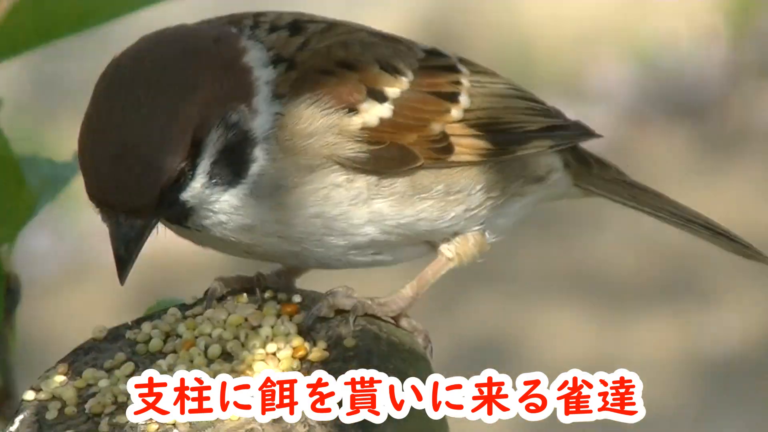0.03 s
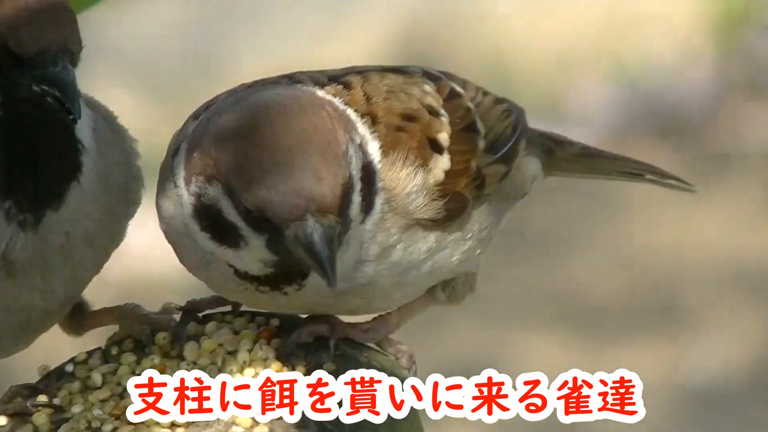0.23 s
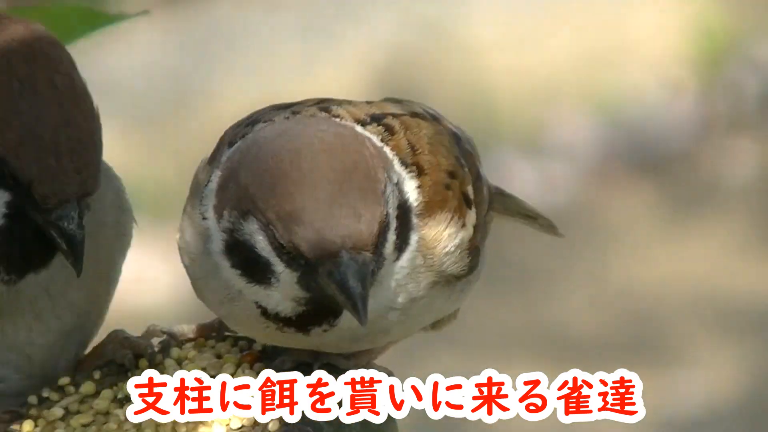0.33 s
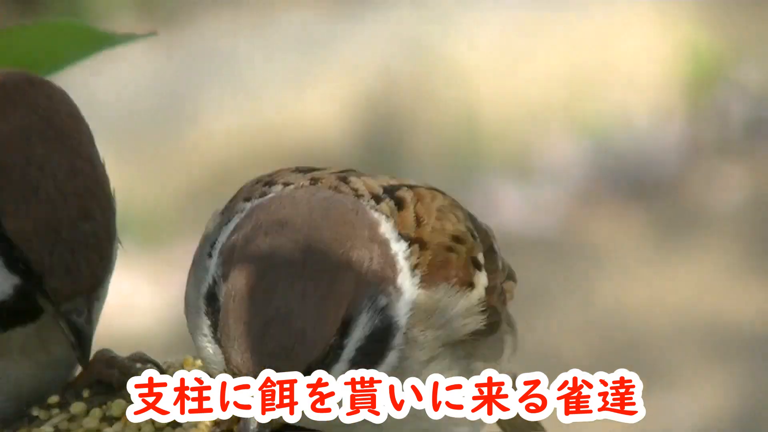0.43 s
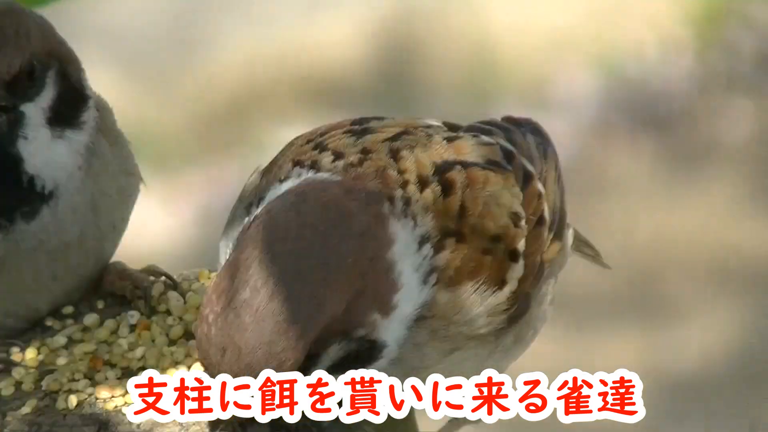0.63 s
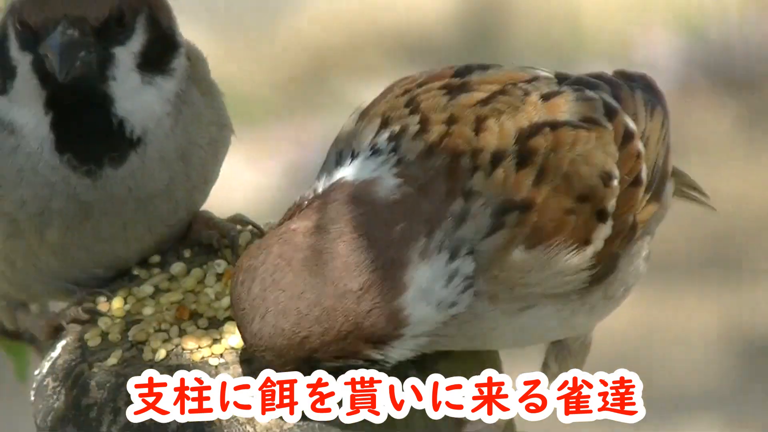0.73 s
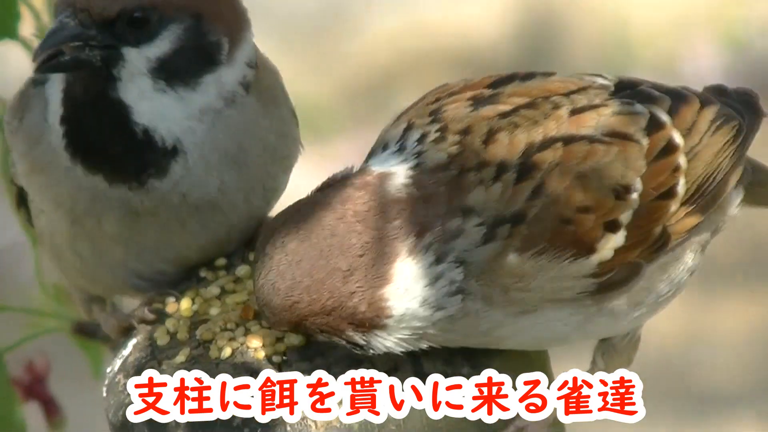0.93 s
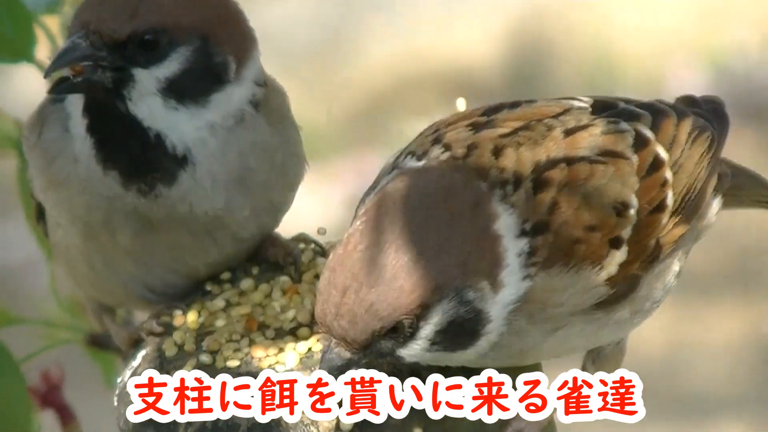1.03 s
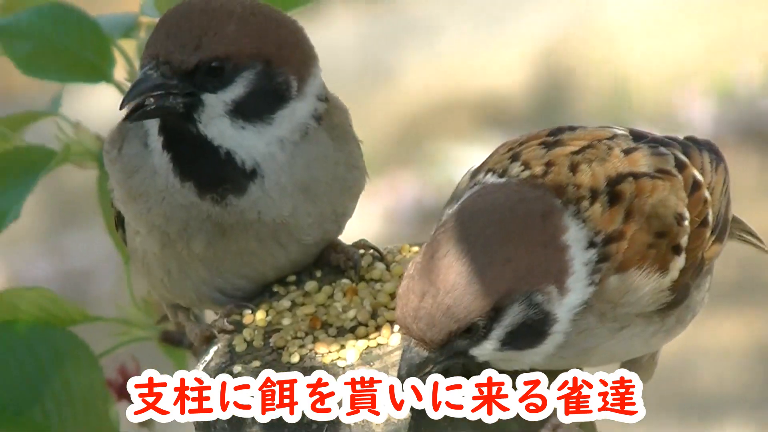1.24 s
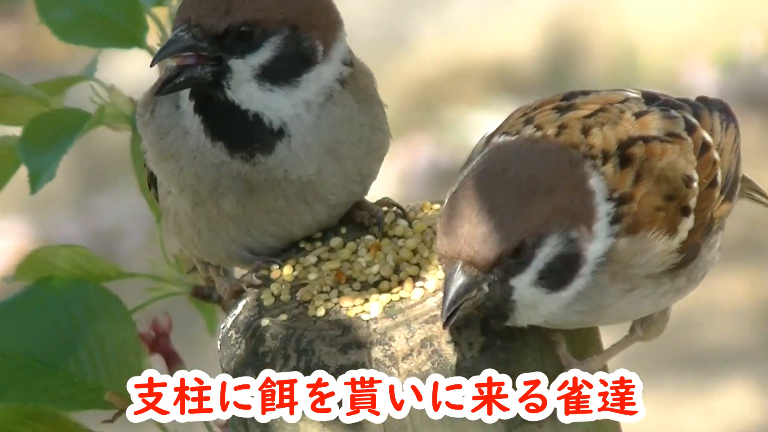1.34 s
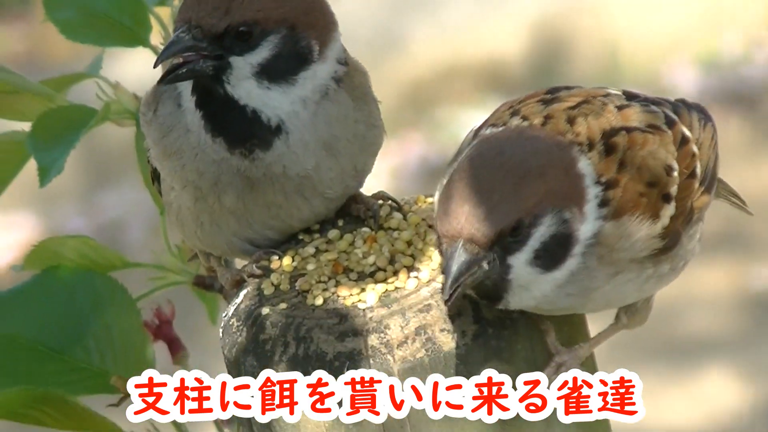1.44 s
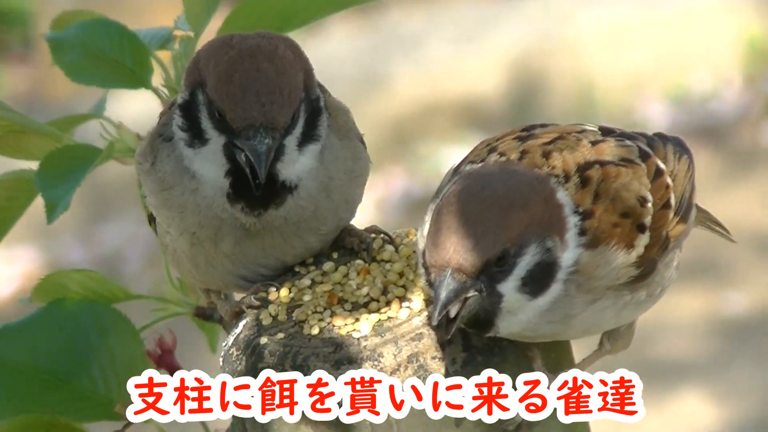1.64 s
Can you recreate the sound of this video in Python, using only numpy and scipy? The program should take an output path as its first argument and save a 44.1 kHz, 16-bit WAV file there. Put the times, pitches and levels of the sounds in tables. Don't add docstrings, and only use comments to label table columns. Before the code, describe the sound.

Sparrows chirp at close range outdoors. Small scrapes and ticks open, then a sharp chirp slides up and down at 0.2-0.34 seconds. Soft wing thumps and feather hiss flutter until about 0.65, with pecking clicks. At 0.92 a hoarse breath leads into a rapid falling trill, ending near 1.03. Faint distant whistles follow until 1.17, then scuffs and seed clicks over a low, gently fading hum.

```python
import sys
import numpy as np
from scipy import signal
from scipy.io import wavfile
from scipy.ndimage import uniform_filter1d

SR = 44100
rng = np.random.default_rng(int(sys.argv[2]) if len(sys.argv) > 2 else 0)


def wav_record(signal):
    frames = np.transpose(np.atleast_2d(signal))
    bounded = np.clip(frames, -1, 1)
    quanta = np.round(bounded * 32767).astype(np.int16)
    wavfile.write(sys.argv[1], SR, quanta)


def elevation(decibels):
    levels = np.asarray(decibels, float)
    return 10 ** (levels / 20)


N = 74970

# t/s, level/dB
HUM_SWELL = [
    (0, 3),
    (.5, 2),
    (1.1, 0.5),
    (1.7, 0),
]
# f/Hz, level per Hz/dB
HUM_COLOR = [(40, -46), (100, -5), (250, 0.5), (600, -4.5), (1500, -8.5), (4000, -19), (8500, -27),
             (15800, -38)]
# f/Hz, likeness (0 to 1)
EAR_LIKENESS = [(60, 0.97), (180, 0.99), (550, 0.97), (1650, 0.91), (4970, 0.86), (15000, 0.96)]
# start t/s, length/s, level/dB, f/Hz
SCUFFS = [
    (0, 0.031, -47.5, 4300),
    (0.122, 0.025, -56.5, 7450),
    (0.197, 0.031, -40, 7260),
    (0.343, 0.12, -53.5, 2800),
    (0.451, 0.074, -51, 4890),
    (0.657, 0.11, -58.5, 7100),
    (0.755, 0.11, -56.5, 2560),
    (1.269, 0.053, -51.5, 4640),
    (1.396, 0.11, -58, 5400),
    (1.446, 0.042, -48.5, 3280),
]
# t/s, peak level/dB, ring f/Hz, top f/Hz
TICKS = [(0.0351, -35, 4330, 10600), (0.0695, -32.5, 2980, 10500), (0.217, -22.5, 8950, 12300),
         (.4325, -36, 2100, 4000), (.434, -49, 6000, 12940), (.4615, -41, 4070, 9000),
         (0.4868, -25.5, 3500, 12100), (0.554, -41, 7000, 14000), (0.5945, -39, 6000, 13000),
         (0.817, -38.5, 3480, 14000), (0.865, -35, 4360, 7600), (.9145, -39, 1800, 5000),
         (1.042, -46, 10000, 12000), (1.123, -38.5, 4500, 8300), (1.179, -52, 10500, 12500),
         (1.213, -46, 5500, 9000), (1.222, -53, 9000, 13000), (1.2335, -35.5, 2980, 8450),
         (1.257, -52, 8000, 12000), (1.278, -41, 3500, 9000), (1.3299, -34, 10500, 17600),
         (1.379, -46, 4000, 8500), (1.418, -37, 4500, 8000), (1.4492, -29, 3270, 8950),
         (1.4528, -45, 3950, 5960), (1.4548, -33, 2980, 9500), (1.4652, -37, 2300, 5000),
         (1.468, -46, 3200, 6500), (1.58, -50, 7000, 10000), (1.616, -61, 5000, 9000)]
# t/s, thud level/dB, thud f/Hz, feather hiss level/dB
WING_BEATS = [(.068, -44.5, 1310, -68), (.108, -49.5, 446, -72), (.33, -43, 920, -46.5),
              (.397, -48, 700, -53.5), (.432, -38, 790, -54.5), (0.47, -43, 495, -49),
              (0.513, -43.5, 770, -50), (.553, -36.5, 746, -61), (0.593, -49, 700, -55.5),
              (.631, -43.5, 860, -53.5), (.669, -67, 590, -57.5), (0.759, -73, 600, -55.5),
              (1.238, -55, 1390, -78), (1.382, -49, 1460, -76), (1.086, -46.5, 1190, -77)]
# t/s, f/Hz, level/dB, step from one overtone to the next/dB
SLIDE_LOW = [(.203, 2080, -71, 6), (.213, 2066, -40.5, 7), (.233, 2031, -36, -5.5), (.246, 2690, -33, -8.5),
             (.256, 3482, -31.5, -13), (.267, 3770, -28.5, -16), (.283, 3370, -27.5, -10.5),
             (.3, 3184, -23.5, -15.5), (.31, 2968, -22, -11.5), (.325, 2270, -21.5, -12.5),
             (.331, 1886, -34.5, -7.5), (.344, 1460, -49, 6)]
# t/s, f/Hz, level/dB, step from one overtone to the next/dB
SLIDE_HIGH = [
    (.203, 2760, -62, 2),
    (.212, 2690, -43, 3),
    (.222, 2600, -46, 3),
    (.235, 2620, -50, -3),
    (.246, 3520, -37, -14),
    (.2545, 4680, -23.5, -30),
    (.262, 4970, -23, -30),
    (.2715, 4880, -23.5, -30),
    (.277, 4100, -46, -30),
]
# f/Hz, level/dB
THROAT = [(1500, -1), (5000, 1.5), (7000, -1.5), (9000, -1), (12000, 10), (15500, -4)]
# delay t/s, level/dB
ECHOES = [
    (.004, -21),
    (.011, -23),
]
# t/s, f/Hz, level/dB
RASP = [
    (.918, 6900, -51.5),
    (.93, 6700, -46.5),
    (.943, 5800, -40),
    (.951, 4900, -33),
    (.958, 5800, -46),
    (.984, 5430, -44),
    (.991, 4930, -39),
    (.998, 5330, -50),
    (1.026, 4400, -51),
]
# top t/s, top f/Hz, next dip f/Hz, level/dB, overtone step at dip/dB
TRILL = [
    (.9645, 4750, 3284, -26.5, 4),
    (.977, 4092, 3307, -24, 5.5),
    (.987, 3924, 1995, -23.5, 12.5),
    (0.9957, 3262, 2485, -26.5, -4),
    (1.0032, 3090, 2415, -26.5, -8),
    (1.01, 2914, 2114, -33, -4),
    (1.0162, 2945, 2090, -35.5, -8),
    (1.024, 2920, 3000, -42, -12),
]
# t/s, f/Hz, level/dB
TRILL_SECOND = [
    [(.961, 4250, -45), (.964, 4350, -30), (.970, 4350, -30), (.973, 4000, -42)],
    [(.975, 4500, -36), (.9765, 4750, -24), (.9785, 5300, -36), (.983, 4800, -36), (.987, 4600, -50)],
]
# t/s, f/Hz, level/dB
FAR_WHISTLES = [
    [(1.04, 3000, -70), (1.06, 3330, -61), (1.085, 3500, -58), (1.12, 3360, -56), (1.127, 3250, -60)],
    [(1.1, 5200, -68), (1.122, 4980, -64), (1.131, 4050, -67), (1.143, 3750, -66), (1.15, 3400, -73),
     (1.165, 3280, -66)],
]


def evened(x):
    return x / np.sqrt(np.mean(x ** 2) + 1e-20)


def read(points, hz):
    f, value = np.transpose(points)
    return np.interp(np.log(hz + 1), np.log(f + 1), value)


def add(mix, s, sound):
    at = round(s * SR)
    sound = sound[max(-at, 0):]
    part = mix[max(at, 0):][:len(sound)]
    part += sound[:len(part)]


def resonate(x, hz, width_hz, times=1):
    turn = np.exp(2j * np.pi * np.cumsum(hz * np.ones(len(x))) / SR)
    r = np.exp(-np.pi * abs(width_hz) / SR)
    for _ in range(times):
        x = 2 * (turn * signal.lfilter([1 - r], [1, -r], x / turn + 1e-18)).real
    return x


def controls(rows, smooth_s=0.0038):
    s, hz, db, *step = np.transpose(rows)
    step = step[0] if step else np.full(len(s), -25.0)
    t = np.arange(N) / SR
    curves = np.interp(t, s, hz), np.interp(t, s, db, -120, -120), np.interp(t, s, step)
    return [uniform_filter1d(c, max(int(smooth_s * SR), 1)) for c in curves]


def partial(turns, hz, db):
    gain = np.sqrt(2) * elevation(db + read(THROAT, hz)) * (hz < SR / 2.6)
    return gain * np.sin(2 * np.pi * turns)


def voice(hz, db, step, jitter=.02, shimmer_db=-5.5, breath_db=-24, upper_db=-8, count=5):
    wobble = rng.standard_normal((2, N))
    wobble = evened(uniform_filter1d(uniform_filter1d(wobble, size=40), size=40))
    hz = hz * (1 + jitter * wobble[0])
    db = db + shimmer_db * wobble[1]
    turns = np.cumsum(hz) / SR
    breath = 1 + elevation(breath_db) * evened(uniform_filter1d(rng.standard_normal(N), size=16))
    upper = np.minimum(1.17 * step, upper_db)
    tone = partial(turns, hz, db)
    for k in range(2, count + 1):
        tone = tone + partial(k * turns, k * hz, db + step + upper * (k - 2))
    return turns, breath * tone


def hum():
    frames, hz = N // 128 + 5, np.fft.rfftfreq(512, 1 / SR)
    a, b, c, d, patches = rng.standard_normal((frames, 257, 5)).T
    patches = evened(uniform_filter1d(uniform_filter1d(patches, size=8, axis=0), size=10, axis=1))
    flicker = evened(uniform_filter1d(rng.standard_normal(frames), size=3))
    same = np.clip(read(EAR_LIKENESS, hz), 0, 1)[:, None]
    mid = np.sqrt(1 + same) * (a + 1j * b)
    side = np.sqrt(1 - same) * (c + 1j * d)
    color_db = read(HUM_COLOR, hz)[:, None] + 0.58 * patches + 1.73 * flicker
    spectrum = np.array([mid + side, mid - side]) * elevation(color_db)
    noise = signal.istft(spectrum, nperseg=512, noverlap=384)[1][:, :N]
    swell_db = np.interp(np.arange(N) / SR, *np.transpose(HUM_SWELL))
    return elevation(-51 + swell_db) * evened(noise)


def scuffs():
    out = np.zeros(N)
    dull = signal.butter(3, 10000, fs=SR, output="sos")
    for s, length_s, db, hz in SCUFFS:
        grain_db = 2.5 * np.minimum(rng.exponential(1, 4000), 4)
        grit = rng.standard_normal(4000) * elevation(grain_db)
        grit = evened(resonate(resonate(grit, hz, 1.4 * hz, 2), 2100, 13000))
        grit = signal.sosfilt(dull, grit)[:int(length_s * SR)]
        stroke = np.sin(np.pi * np.linspace(0, 1, len(grit)) ** 0.74)
        add(out, s, elevation(db) * grit * stroke)
    return out


def ticks():
    out, t = np.zeros(N), np.arange(600) / SR
    for s, db, hz, top_hz in TICKS:
        knock = 6.0 * (abs(t - .0003) < .5 / SR)
        grit = rng.standard_normal(len(t)) * (.6 * np.exp(-t / 0.001) + 0.3 * np.exp(-t / 0.0044))
        click = resonate(knock + grit, hz, 1.1 * hz)
        edges = [.3 * hz, min(top_hz, SR / 2.2)]
        click = signal.sosfilt(signal.butter(5, edges, "bandpass", fs=SR, output="sos"), click)
        add(out, s - .0006, elevation(db) * click / abs(click).max())
    t = np.arange(1000) / SR
    husk_s, husk_hz, husk_db, husk_t60_s = 1.195, 9800, -56, .045
    husk = evened(resonate(rng.standard_normal(len(t)), husk_hz, 550, 2))
    add(out, husk_s, elevation(husk_db - 60 * t / husk_t60_s) * husk)
    return out


def wings():
    out, t = np.zeros(N), np.arange(-.02, .03, 1 / SR)
    thump_s, hiss_s = .003, .005
    for s, thud_db, hz, hiss_db in WING_BEATS:
        noise = rng.standard_normal((2, len(t)))
        push = noise[0] ** 3 * np.exp(-((t + 0.00077) / thump_s) ** 2 / 2)
        thud = resonate(resonate(push, hz, 300), hz, 1350) + 0.24 * resonate(push, 2.46 * hz, 800)
        grain_db = 3.8 * np.minimum(rng.exponential(1, len(t)), 4)
        hiss = evened(resonate(resonate(noise[1] * elevation(grain_db), 4300, 13000), 3000, 15000))
        add(out, s - .02, elevation(thud_db + 5.5) * thud / abs(thud).max()
            + elevation(hiss_db + 2) * hiss * np.exp(-abs(t - .001) / hiss_s))
    return out


def slide_call():
    low_hz, low_db, low_step = controls(SLIDE_LOW, 0.004)
    high_hz, high_db, high_step = controls(SLIDE_HIGH, 0.0019)
    low_turns, low = voice(low_hz, low_db, low_step, jitter=.006, shimmer_db=1.2,
                           breath_db=-20, upper_db=-8, count=4)
    high_turns, high = voice(high_hz, high_db, high_step, jitter=.003, shimmer_db=.4,
                             breath_db=-25, upper_db=-9)
    mix_db = np.minimum(low_db, high_db) - 7 + 8.5 * np.clip((2500 - low_hz) / 400, 0, 1)
    mixed = np.zeros(N)
    for m, n in ((1, 1), (2, 1), (1, 2)):
        mixed += partial(m * low_turns + n * high_turns, m * low_hz + n * high_hz, mix_db - 32.0 * (m + n - 2))
    mixed += partial(2 * high_turns - low_turns, 2 * high_hz - low_hz, mix_db - 7)
    haze = evened(resonate(rng.standard_normal(N), 1.5 * low_hz, 2500, 3))
    mixed += elevation(np.maximum(low_db - 6, high_db) - 29) * haze
    throb_s, throb_hz, throb_rise_s = .3138, 225, .004
    t = np.arange(N) / SR - throb_s
    depth = .9 * np.clip(1 + t / throb_rise_s, .12, 1)
    throb = 1 - depth * np.cos(np.pi * throb_hz * t) ** 8
    return low * throb + high + mixed


def yard(x):
    level_db, t60_s, color_hz = -25, 0.2, 2900
    t = np.arange(SR // 3) / SR
    noise = rng.standard_normal((2, len(t))) * elevation(-60 * t / t60_s) * (t > .004)
    tail = np.array([resonate(noise[0] + .35 * side * noise[1], color_hz, 3000) for side in (1, -1)])
    tail *= elevation(level_db) / np.linalg.norm(tail[0])
    tail[:, 0] = 1
    for s, db in ECHOES:
        tail[:, round(s * SR)] += elevation(db)
    return signal.fftconvolve(x[None], tail, axes=1)[:, :N]


def rasp(trill_db):
    hz, db, _ = controls(RASP)
    air = rng.standard_normal((3, N))
    lead = evened(resonate(air[0], hz, 2000, 2))
    lead = lead + elevation(-10) * evened(resonate(air[1], 1.53 * hz, 3400, 2))
    lead = lead + elevation(-6.5) * evened(resonate(air[2], hz / 2, 2200, 2))
    halo = evened(resonate(air[1], 6400, 5700, 2))
    return elevation(db) * lead + elevation(uniform_filter1d(trill_db, size=200) - 17.5) * halo


def trill_call():
    top_s, top_hz, dip_hz, db, dip_step = np.transpose(TRILL)
    t = np.arange(N) / SR
    dip_s = top_s + 0.58 * np.diff(top_s, append=top_s[-1] + 0.0043)
    turning = np.arange(2 * len(top_s))
    place = np.interp(t, np.ravel([top_s, dip_s], "F"), turning)
    eased = np.floor(place) + .5 - .5 * np.cos(np.pi * (place % 1))

    def swing(at_top, at_dip):
        return np.interp(eased, turning, np.ravel([at_top, at_dip], "F"))

    top_step = -10.5
    hz = swing(top_hz, dip_hz)
    level = swing(db, db - 2 - np.maximum(dip_step, 0))
    step = swing(top_step - 10 * np.clip(top_hz / 1000 - 3, 0, 1), dip_step)
    leap_s, leap_hz, leap_tau_s, leap_db = 0.95, 2208, .005, -50
    left = np.exp(-np.maximum(t - leap_s, 0) / leap_tau_s) * (t < top_s[1])
    hz = hz - (top_hz[0] - leap_hz) * left
    level = level - (db[0] - leap_db) * left
    step = step + (10.0 - top_step) * left
    level -= 5600.0 * (np.maximum(leap_s - t, 0) + np.maximum(t - dip_s[-1], 0))
    out = voice(hz, level, step, jitter=0.008, shimmer_db=1.2, breath_db=-18, upper_db=-20)[1]
    out += rasp(level)
    for rows in TRILL_SECOND:
        out += voice(*controls(rows, 0.0019), jitter=.015, count=2)[1]
    return out


def far_whistles():
    return sum(voice(*controls(rows, 0.0048), jitter=0.0102, shimmer_db=3.5, count=1)[1]
               for rows in FAR_WHISTLES)


def scene():
    stir = wings() + ticks() + scuffs()
    late = elevation(-18.5) * np.roll(stir, 30)
    calls = slide_call() + trill_call() + far_whistles()
    return yard(calls) + np.array([stir + late, stir - late]) + hum()


def low_pass(x):
    return signal.sosfilt(signal.butter(12, 15750, fs=SR, output="sos"), x)


def record(dry):
    sos = signal.butter(2, [70, 15500.], "bandpass", fs=SR, output="sos")
    mix = signal.sosfilt(sos, dry)
    return low_pass(mix)


dry = scene()
out = record(dry)
wav_record(out)
```